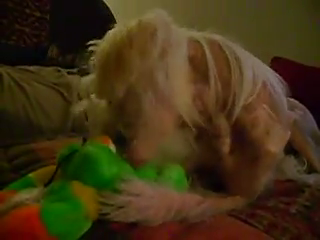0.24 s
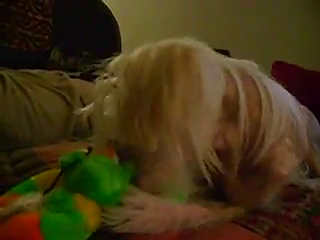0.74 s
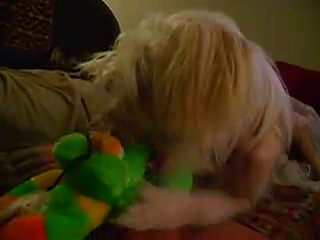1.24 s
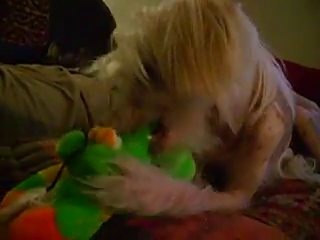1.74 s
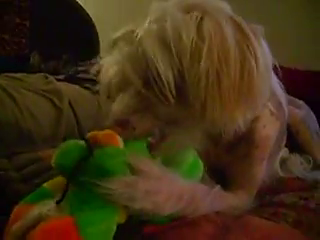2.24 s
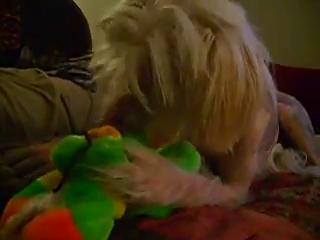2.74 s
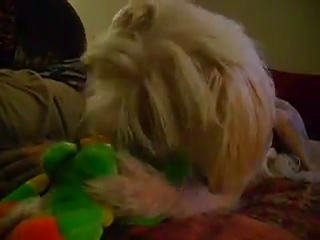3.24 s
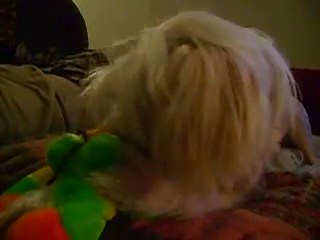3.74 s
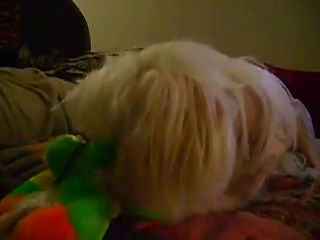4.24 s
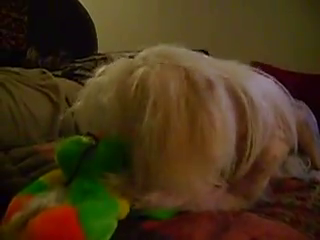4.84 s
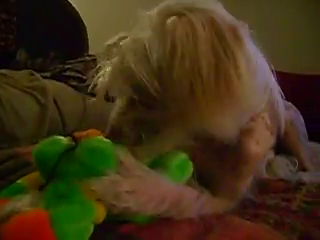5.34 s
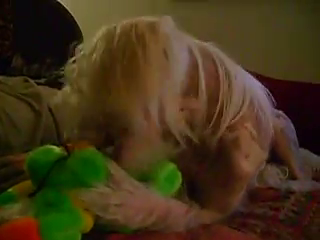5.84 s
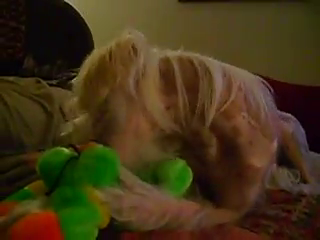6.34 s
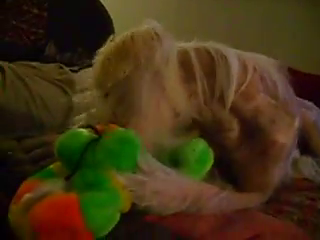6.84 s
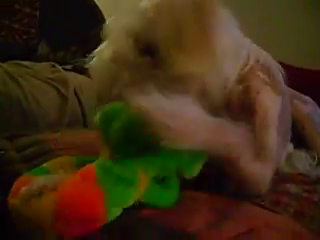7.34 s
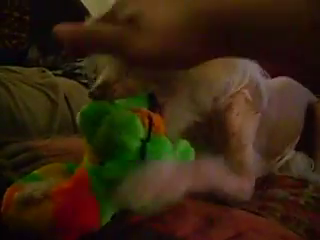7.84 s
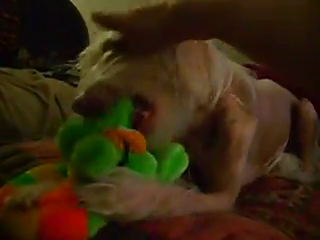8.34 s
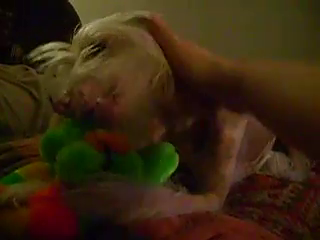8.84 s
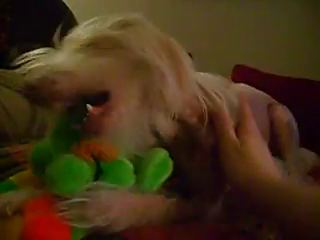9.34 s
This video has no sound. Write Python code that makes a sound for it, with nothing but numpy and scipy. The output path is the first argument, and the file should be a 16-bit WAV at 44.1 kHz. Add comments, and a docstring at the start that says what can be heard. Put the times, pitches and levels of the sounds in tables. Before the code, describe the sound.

Brief nasal toy squeaks burst and pause, then dry clicks and rustling take over, above a constant hollow air conditioner hum captured by a cheap microphone.

```python
"""On a bed in an air-conditioned room, a small dog chews a plush toy.
Each bite drives air through a plastic reed: a beating, sliding squeak built from overtones and air noise.
Thin tones trail some sounds; clicks and a short rustle are noise with short rings; low thumps are dying sines.
The air conditioner drones as shaped noise and wavering motor tones.
A cheap camera samples slowly, so high overtones fold down, and it clips the loudest squeaks."""
import sys
import numpy as np
from scipy import signal
from scipy.fft import rfft, irfft, next_fast_len
from scipy.io import wavfile
from scipy.ndimage import uniform_filter1d, map_coordinates

SR = 44100
rng = np.random.default_rng(int(sys.argv[2]) if len(sys.argv) > 2 else 0)


def wrap_up_sound(samples):
    """Save the sound to the file named by the first command line argument, as 16-bit audio."""
    columns = np.atleast_2d(samples).T
    # keep every value between -1 and 1, then stretch to whole-number steps
    tamed = np.clip(columns, -1, 1)
    steps = np.round(tamed * 32767).astype(np.int16)
    wavfile.write(sys.argv[1], SR, steps)


N = 422919
TIME = np.arange(N) / SR

# One bite on the reed: (start [s], length [s], climb to top pitch [s], top pitch [Hz], slide [s],
# settled pitch [Hz], final sag [s], fundamental level [dB rms], fade over the bite [dB],
# 2nd overtone, 3rd overtone, higher overtones, air noise [all dB re fundamental],
# unevenness of alternate beats [0-1], wave lean [1 up, -1 down])
SQUEAK_BITES = [(0.424, 0.034, .002, 1087, .026, 1042, .007, -13, -1, -9, -21, -16, -26, 0.25, -1),
                (0.519, 0.0056, 0.0026, 1072, .002, 1070, .002, -15, -1, -10, -13.5, -20.5, -26, 0, 1),
                (0.944, 0.062, .016, 1229, .017, 1063, .005, -6, -5, -13.5, -13, -20, -21, 0.058, 1),
                (1.773, .032, .004, 1454, .023, 1335, .004, -10.5, -2.5, -7, -11.5, -12, -20.5, .26, -1),
                (2.1795, .0165, 0.0027, 1474, 0.0098, 1404, 0.005, -13, -2, -5, -2.5, -12, -20, .75, -1),
                (2.349, 0.047, .004, 1095, .036, 1068, .004, -8.5, -5, -7.5, -15.5, -19.5, -19.5, .025, 1),
                (3.602, 0.023, .003, 1059, 0.017, 1075, 0.0049, -11, 0, -12, -18.5, -22, -30, 0.048, 1),
                (3.766, .011, .0055, 1693, .003, 1450, 0.0028, -13.5, -2, -4.5, -3, -7, -10.5, .42, 1),
                (3.962, 0.032, .004, 1081, 0.021, 1105, 0.0037, -13, 2.5, -13, -17, -22, -29.5, 0.16, 1),
                (6.445, .016, .001, 1534, .011, 1392, 0.00484, -16.5, -2.5, 5.5, -1.5, -4, -11.5, 0.37, -1),
                (6.554, .038, .003, 1151, 0.027, 1100, 0.011, -11, -3, -13.5, -14, -23, -23, .19, 1),
                (8.083, 0.0033, 0.00098, 1080, 0.0022, 1076, 0.0024, -12, -5.5, -9, -6.5, -15, -13, 0.12, 1)]
# Higher overtones of the reed: (multiple of the pitch, level [dB])
HIGH_OVERTONES = [(4, -5), (5, -6.5), (6, -5.5), (7, -5.5), (8, -5.5)]
# Air past the reed: (frequency [Hz], relative level [dB per Hz])
PUFF_SPECTRUM = [(30, -25.5), (300, 11.5), (1000, -8), (3000, -13.5), (6000, -2)]
# Thin tones that trail some squeaks and clicks: (start [s], pitch [Hz], level [dB], decay by 60 dB [s])
WHISTLE_TONES = [(1.808, 2870, -40, 0.28), (2.198, 2940, -38, 0.35), (2.405, 2170, -30, 0.061),
                 (7.053, 507, -26.5, 0.22)]
# Clicks, and a short rustle near 6.48 s: (peak time [s], scratch level [dB], scratch decay by 60 dB [s],
# crack pitch [Hz], hollow knock level [dB], knock pitch [Hz])
CLICK_HITS = [(1.7694, -31, .0095, 2000, -16, 980), (1.845, -32.5, .022, 3000, -31, 1030),
              (2.975, -34.5, .02, 2540, -42, 1150), (3.932, -31, .015, 2960, -35, 704),
              (4.052, -39.5, .015, 2480, -25.5, 710), (4.964, -44, .015, 2460, -19, 890),
              (5.111, -26, .012, 2400, -26, 1800), (5.5355, -33.5, 0.014, 2030, -33, 1110),
              (5.563, -31, .012, 2050, -34, 1060), (5.684, -37, .012, 2850, -23.5, 900),
              (6.474, -27.5, 0.058, 2400, -38.5, 883), (6.483, -29, 0.045, 2920, -42, 890),
              (6.497, -27, .03, 2900, -41, 864), (6.804, -22.5, .046, 2200, -21.5, 697),
              (6.841, -21.5, .03, 3130, -24, 910), (6.9395, -22, .027, 2070, -16, 767),
              (6.9967, -15.5, .014, 3000, -30, 1060), (7.0526, -14, .011, 2500, -26.5, 530),
              (7.842, -36, .015, 2500, -22.5, 1300), (7.864, -30, .013, 3220, -31, 1230),
              (8.719, -41, 0.019, 2490, -21, 1100)]
# Scratch noise: (frequency [Hz], relative level [dB per Hz])
SCRATCH_SPECTRUM = [(400, -27), (1500, 4.5), (3000, -2.5), (6000, -10)]
# Low thumps, one of them under a loud squeak: (time [s], level before the lift [dB], pitch [Hz])
THUMP_HITS = [(0.948, -16.5, 63.7), (2.06, -25, 108.5), (2.163, -24.5, 71.7), (5.177, -28, 90.5),
              (5.26, -35, 170), (5.278, -35, 150)]
# Echo of the walls: (frequency [Hz], decay by 60 dB [s])
WALL_DECAY = [(200, .2), (1000, 0.23), (2500, 0.24), (5500, 0.098)]
# Air conditioner rush: (time [s], duct level [dB], upper duct level [dB])
DUCT_LEVELS = [(0.0, -35, -56), (0.24, -34.5, -50), (1.68, -37, -55), (2.08, -39, -49.5),
               (2.24, -37, -45.5), (3.12, -36.5, -45.5), (4.81, -35, -45.5), (5.13, -39, -47),
               (5.95, -39, -54), (6.38, -37.5, -48.5), (7.1, -33.5, -49), (7.18, -36, -47.5),
               (8.33, -35, -49), (8.73, -35.5, -54.5), (9.59, -35.5, -60)]
# Lower duct resonance: (frequency [Hz], relative level [dB per Hz])
DUCT_SPECTRUM = [(850, -19), (1000, 3), (1100, 5), (1250, 4.5), (1380, -4.5), (1500, -36)]
# Upper duct resonance: (frequency [Hz], relative level [dB per Hz])
UPPER_DUCT_SPECTRUM = [(1250, -28), (1380, 10), (1500, 8.5), (1650, -25)]
# Air conditioner rumble: (frequency [Hz], relative level [dB per Hz])
RUMBLE_SPECTRUM = [(11, -34.5), (18, -8), (65, -8.5), (82, -22), (171, -16), (209, -1), (261, -16.5),
                   (298, -6), (330, -9.5), (410, -3), (614, -12.5), (804, -2.5), (1000, -8.5), (1300, -36),
                   (2200, -120)]
# Steady motor tones: (pitch [Hz], level [dB rms], scale of pitch wander [Hz])
MOTOR_TONES = [(28.2, -57.5, 2.4), (56.7, -59.5, 2.5), (205.3, -58, 6), (225.3, -57, 1.77),
               (300.4, -61.5, 4), (410.7, -59.5, 1.24), (513, -58.5, 3), (560, -69, 2.6), (743, -55.5, 3),
               (832, -56, 3)]
# Motor tones that come and go: (start [s], end [s], pitch [Hz], level [dB rms])
MOTOR_SWELLS = [(1.046, 1.643, 1497, -56), (1.345, 1.9, 1022, -41.5), (1.704, 2.7, 797, -47),
                (2.947, 3.65, 1450, -43.5), (3.2, 3.694, 1340, -43), (4.1, 4.95, 1320, -42.5),
                (5.2, 6.353, 739, -53), (7.6, 8.303, 1465, -55), (8.1, 9.546, 1322, -47)]
# Grit that follows the level: (frequency [Hz], relative level [dB per Hz])
GRIT_SPECTRUM = [(300, 1.5), (1500, -1), (3000, -1), (4500, -2.5), (5500, -2.5), (5700, -57)]
# Camera's smoothing filter: (frequency [Hz], gain [dB])
SMOOTHING_EDGE = [(5000, 0), (5500, -4.5), (5900, -17), (6200, -37), (6400, -97.5)]

START_FLAT, EDGE_S = .09, .004  # largest share of pitch lacking at the start; longest edge [s]
START_DIP_DB, END_DIP_DB = -0.5, -3.5  # level dips at both ends of a squeak
SAG_PER_S = 16  # share of the pitch lost per second of final sag
DULLING = 1.8  # dB that 2nd and 3rd overtones lose for each dB of level
TUBE_HZ, TUBE_WIDTH_HZ, TUBE_DB = 6850, 620, 4.5  # tube resonance that lifts nearby higher overtones
CRACK_DB, RISE_SHARE, KNOCK_T60_S = 6.5, .12, 0.029  # crack over scratch; rise / decay; hollow's ring
THUMP_LIFT_DB, THUMP_T60_S = 4.5, 0.032
WET_DB, RUMBLE_DB = -24, -43.5
STRIDE = 4  # samples per step of the slow sampling
CEILING, HARDNESS = .72, 40  # clipping level [full scale]; sharpness of its knee
TOP_HZ = 16660  # upper limit of the band


def amp(db):
    """Turns decibels into gain."""
    return 10 ** (np.asarray(db) / 20)


def unit(x):
    """Scales a sound to rms 1."""
    return x / np.sqrt(np.mean(x ** 2) + 1e-20)


def along(points, hz):
    """Reads a curve of (frequency [Hz], value) points on a log frequency axis."""
    f, v = np.transpose(points)
    return np.interp(np.log(hz + 1), np.log(f + 1), v)


def wobble(rate):
    """Draws a smooth random curve with rate knots a second."""
    knots = rng.standard_normal(int(N * rate / SR) + 4)
    return map_coordinates(knots, [TIME * rate])


def filtered(x, response):
    """Multiplies the spectrum of x by a response of frequency."""
    m = next_fast_len(len(x) + 8192)
    return irfft(rfft(x, m) * response(np.fft.rfftfreq(m, 1 / SR)), m)[:len(x)]


def noise(spectrum, count=N):
    """Shapes white noise by a spectrum and sets it to rms 1."""
    return unit(filtered(rng.standard_normal(count), lambda hz: amp(along(spectrum, hz))))


def add(track, s, x):
    """Mixes x into the track from time s."""
    track[round(s * SR):][:len(x)] += x


def squeaks(rise=0.0029, fall=.0035, flutter_db=0.95, jitter=0.0049, slack=0.0817):
    """The reed beats while the bite lasts: pitch climbs with pressure, slides and sags as the air fails."""
    out, air = np.zeros(N), noise(PUFF_SPECTRUM)
    shake, drift = wobble(180), wobble(250)
    for (s, length, climb, top_hz, slide, settled_hz, sag, level_db, fade_db,
         second_db, third_db, upper_db, air_db, limp, lean) in SQUEAK_BITES:
        edge = min(EDGE_S, climb)
        attack = min(rise, 2 * climb)
        span = slice(round((s - attack) * SR), round((s + length + fall) * SR))
        t = TIME[span] - s
        ending = np.clip(1 - (length - t) / sag, 0, 1)
        pressure = np.clip(np.minimum((t - t[0]) / attack, (t[-1] - t) / fall), 0, 1)

        start_hz = top_hz * (1 - START_FLAT * edge / EDGE_S)
        hz = np.interp(t, [0, climb, climb + slide], [start_hz, top_hz, settled_hz])
        hz *= 1 - SAG_PER_S * sag * ending
        # low pressure flattens the pitch further
        bend = 1 - slack * (1 - pressure) + jitter * drift[span]
        phase = 2 * np.pi * np.cumsum(hz * bend) / SR

        loss_db = START_DIP_DB * np.clip(1 - t / edge, 0, 1)
        loss_db += fade_db * np.clip(t / length, 0, 1) + END_DIP_DB * ending

        # the 3rd overtone flutters apart from the rest, on a shifted copy of the curve
        slap = amp(third_db + 2 * np.roll(shake, 3000)[span]) * np.sin(3 * phase)
        slap += lean * amp(second_db) * np.cos(2 * phase - .5)
        slap *= amp((DULLING - 1) * loss_db)
        for multiple, db in HIGH_OVERTONES:
            tube_db = TUBE_DB / (1 + ((multiple * hz - TUBE_HZ) / TUBE_WIDTH_HZ) ** 2)
            start_phase = rng.uniform(0, 2 * np.pi)
            slap += amp(upper_db + db + tube_db) * np.cos(multiple * phase + start_phase)
        slap *= pressure  # the reed swings freely before it slaps
        slap *= 1 + limp * np.cos(phase / 2)  # strong and weak slaps alternate: lines between overtones

        reed = np.sqrt(2) * (np.cos(phase) + slap) * amp(flutter_db * shake[span])
        out[span] += pressure ** 1.7 * amp(level_db + loss_db) * (reed + amp(air_db) * air[span])
    return out


def whistles():
    """A thin tone, unsteady in level, fades as the squeaker settles."""
    out, t, shake = np.zeros(N), TIME[:SR // 6], wobble(70)
    for s, hz, db, t60 in WHISTLE_TONES:
        envelope = amp(db - 60 * t / t60) * np.minimum(t / 0.0067, 1)
        add(out, s, envelope * np.sin(2 * np.pi * hz * t))
    return out * amp(3 * shake)


def clicks(crack_cycles=6):
    """Scratch noise swells and dies, with a sharp crack and a hollow knock at its peak."""
    out, t = np.zeros(N), TIME[:SR // 6]
    for s, scratch_db, t60, crack_hz, knock_db, knock_hz in CLICK_HITS:
        rise = RISE_SHARE * t60
        after = np.maximum(t - rise, 0)
        # the crack falls 60 dB within crack_cycles
        crack_env = amp(scratch_db + CRACK_DB - 60 * after * crack_hz / crack_cycles)
        crack = crack_env * np.sin(2 * np.pi * crack_hz * after)
        scratch_env = amp(scratch_db - 60 * after / t60) * np.minimum(t / rise, 1)
        scratch = scratch_env * noise(SCRATCH_SPECTRUM, count=len(t))
        knock = amp(knock_db - 60 * after / KNOCK_T60_S) * np.sin(2 * np.pi * knock_hz * after)
        add(out, s - rise, crack + scratch + knock)
    return out


def thumps():
    """Each thump is a low sine that dies fast."""
    out, t = np.zeros(N), TIME[:SR // 8]
    for s, db, hz in THUMP_HITS:
        envelope = amp(db + THUMP_LIFT_DB - 60 * t / THUMP_T60_S)
        add(out, s, envelope * np.sin(2 * np.pi * hz * t))
    return out


def room(x):
    """The walls answer with a noise tail in which each frequency dies at its own speed."""
    hz, t, z = signal.stft(rng.standard_normal(SR // 3), SR, nperseg=256)
    decay = amp(-60 * t / along(WALL_DECAY, hz)[:, None])
    tail = signal.istft(z * decay, SR, nperseg=256)[1]
    delayed = np.pad(x, (200, 0))  # samples
    return signal.fftconvolve(delayed, tail / np.linalg.norm(tail))[:N]


def drone():
    """Air rushes in two duct resonances over a rumble; motor tones waver in pitch and level."""
    s, *columns = np.transpose(DUCT_LEVELS)
    duct_db, upper_db = [np.interp(TIME, s, column) for column in columns]
    flicker = wobble(30)
    out = amp(duct_db + 1.1 * flicker) * noise(DUCT_SPECTRUM)
    out += amp(upper_db + 2.1 * flicker) * noise(UPPER_DUCT_SPECTRUM)
    out += amp(RUMBLE_DB + 0.32 * wobble(2.7)) * noise(RUMBLE_SPECTRUM)
    for hz, db, wander_hz in MOTOR_TONES:
        phase = 2 * np.pi * np.cumsum(hz + wander_hz * wobble(12)) / SR
        out += np.sqrt(2) * amp(db + 1.6 * wobble(2.7)) * np.sin(phase)
    return out


def swells(fade=0.1, wander_hz=3):
    """Each passing motor tone fades in, wavers a little and fades out."""
    out, drift, shake = np.zeros(N), wobble(8.9), wobble(7.4)
    for start, end, hz, db in MOTOR_SWELLS:
        shape = np.clip(np.minimum(TIME - start, end - TIME) / fade, 0, 1)
        phase = 2 * np.pi * np.cumsum(hz + wander_hz * drift) / SR
        out += amp(db) * shape * np.sin(phase)
    return np.sqrt(2) * out * amp(2.0 * shake)


def scene():
    """The toy sounds with its echo from the walls; thumps and machine are mixed in dry."""
    toy = squeaks() + whistles() + clicks()
    wet = amp(WET_DB) * room(toy)
    return (toy + wet + thumps() + drone() + swells())[None]


def record(dry, grit_db=-20, growth=0.74, hiss_db=-58, flicker_db=2.0):
    """Hiss and grit that follows the level join in, unguarded slow sampling folds overtones, peaks clip."""
    power = np.abs(uniform_filter1d(dry[0] ** 2, size=70))
    grit_level = np.sqrt(amp(grit_db) ** 2 * power ** growth + amp(hiss_db) ** 2)
    grit = grit_level * amp(flicker_db * wobble(200)) * noise(GRIT_SPECTRUM)
    gritty = dry[0] + grit
    sampled = np.zeros(N)
    sampled[::STRIDE] = STRIDE * gritty[::STRIDE]
    smooth = filtered(sampled, lambda hz: amp(along(SMOOTHING_EDGE, hz)) * (hz < 6500))
    clipped = smooth / (1 + np.abs(smooth / CEILING) ** HARDNESS) ** (1 / HARDNESS)
    return filtered(clipped, lambda hz: hz < TOP_HZ)[None]


dry = scene()
out = record(dry)
wrap_up_sound(out)
```